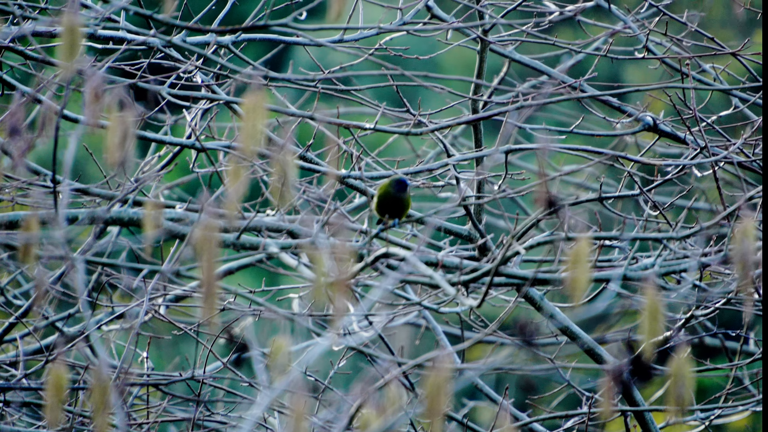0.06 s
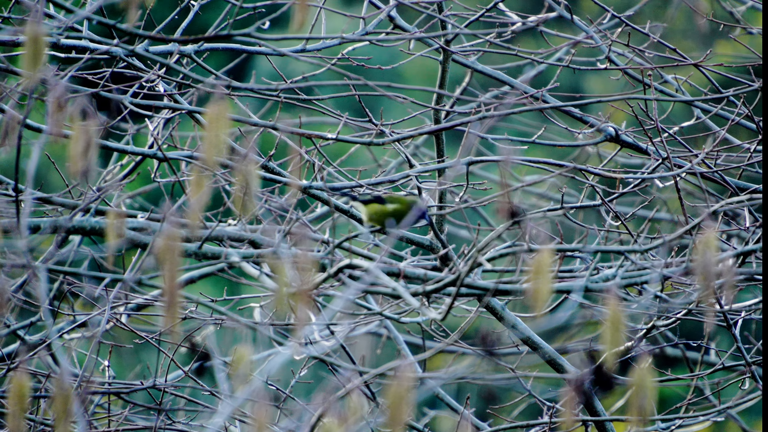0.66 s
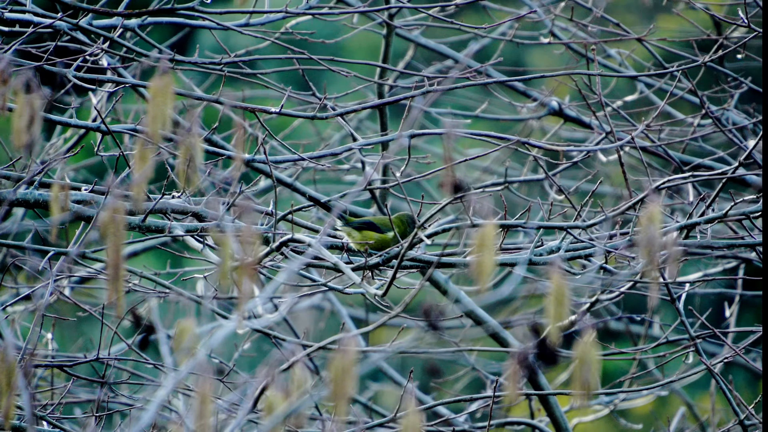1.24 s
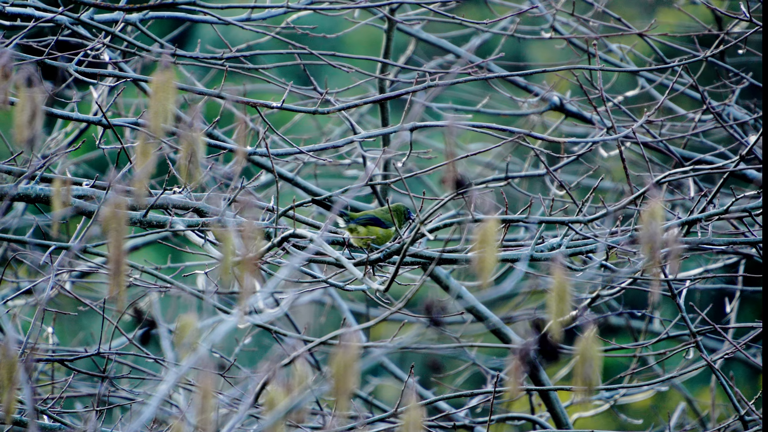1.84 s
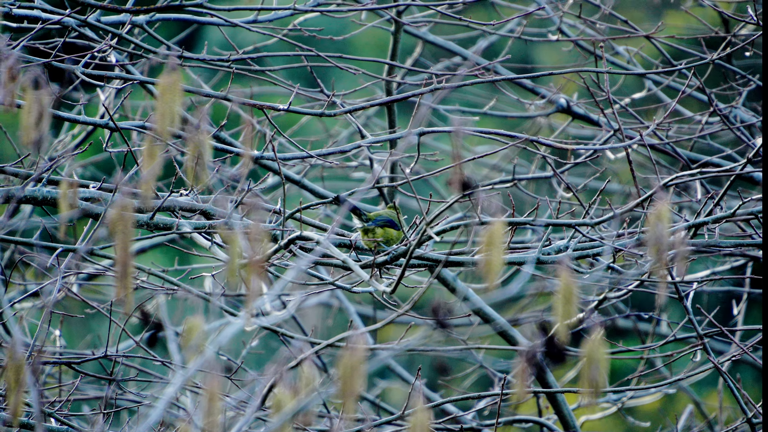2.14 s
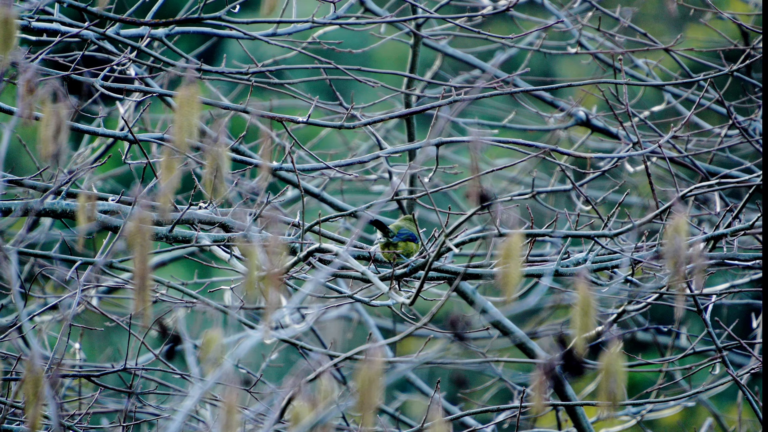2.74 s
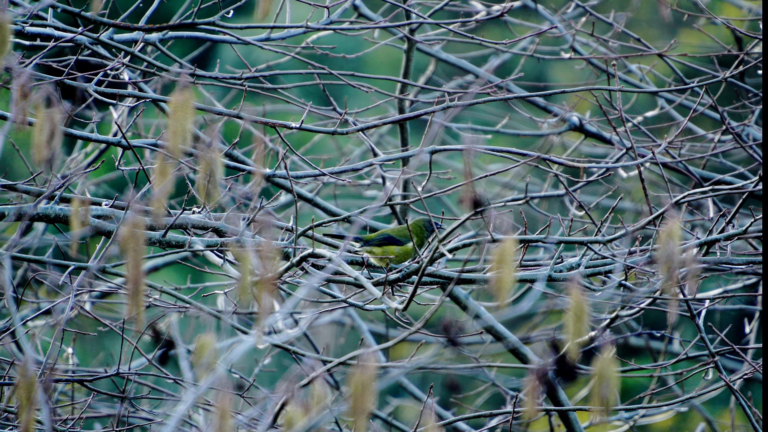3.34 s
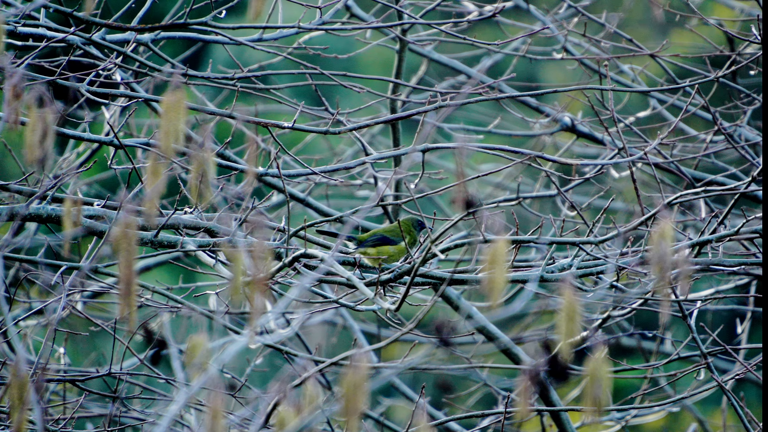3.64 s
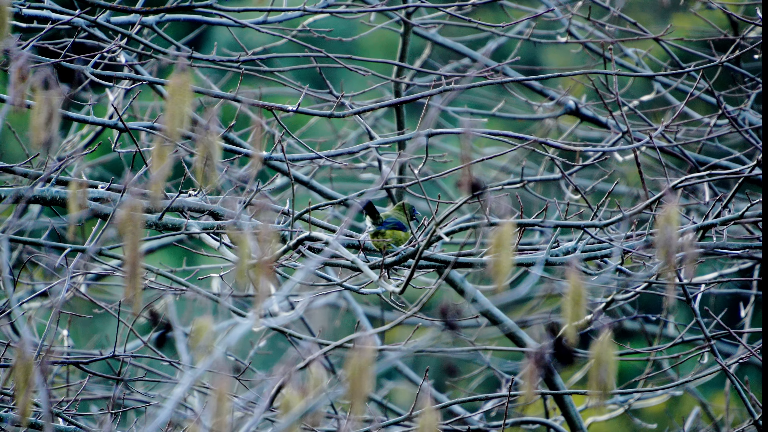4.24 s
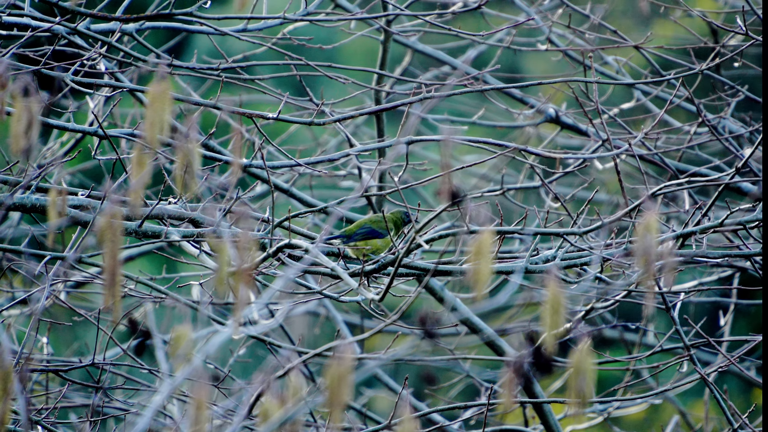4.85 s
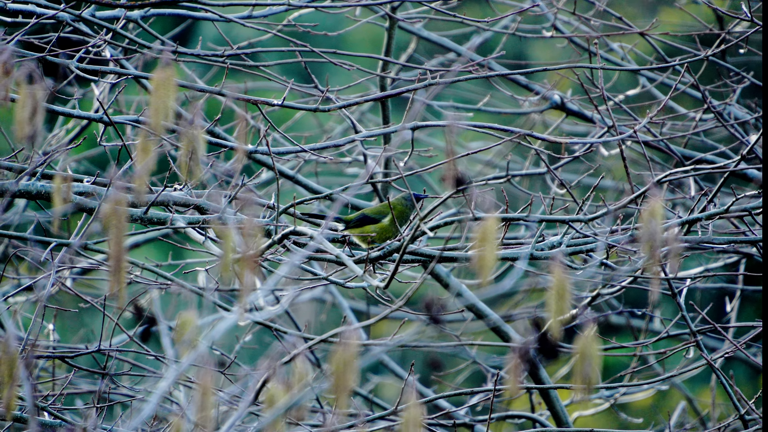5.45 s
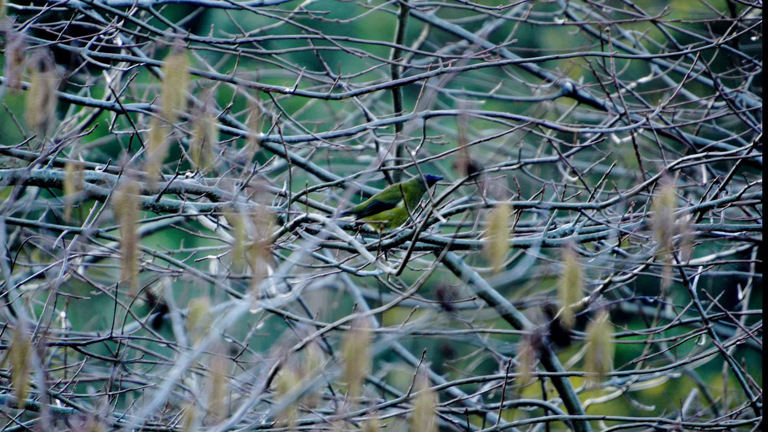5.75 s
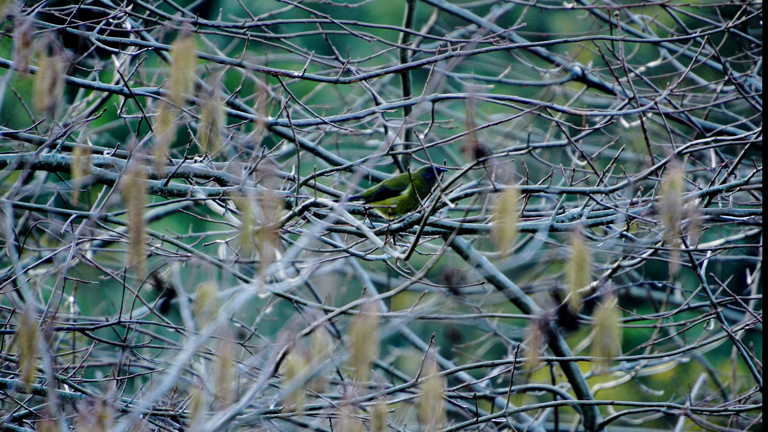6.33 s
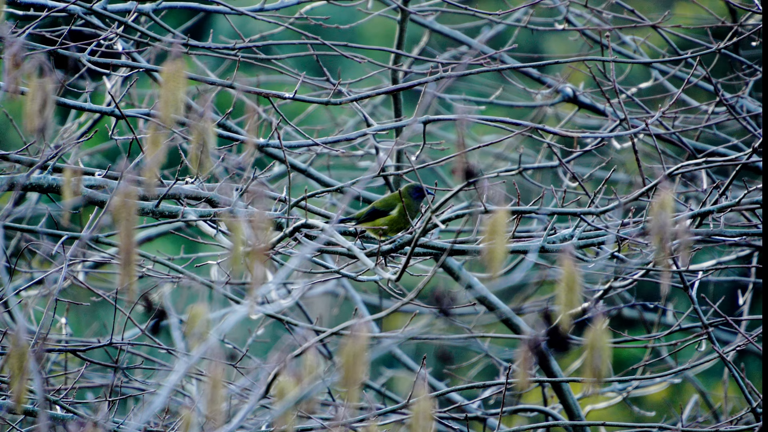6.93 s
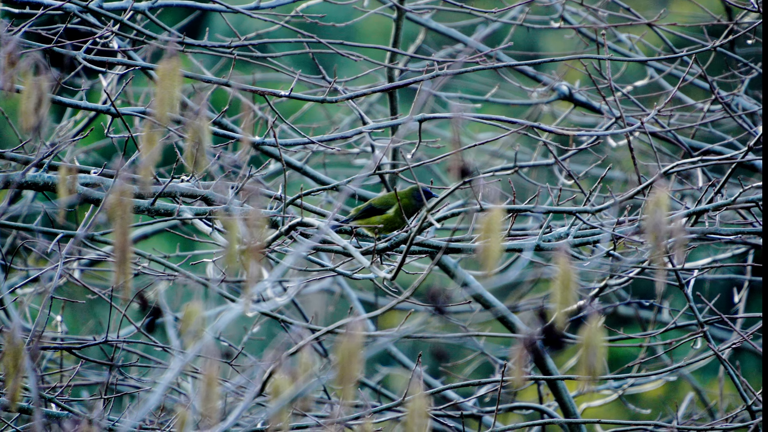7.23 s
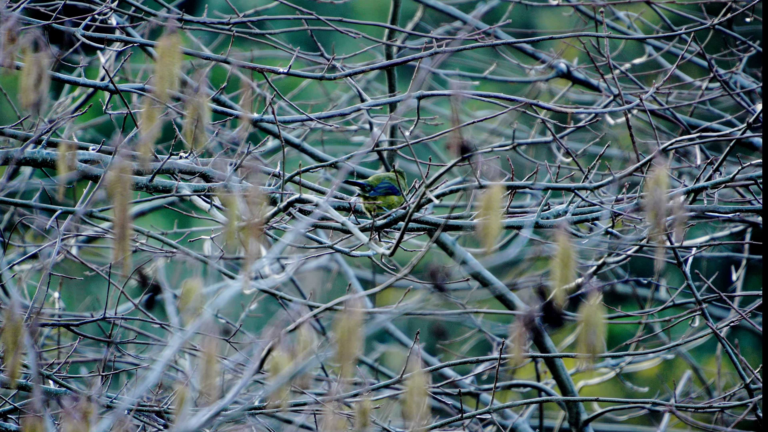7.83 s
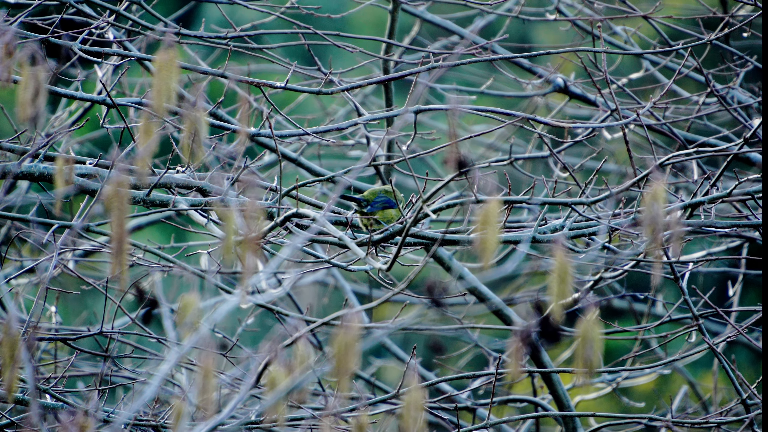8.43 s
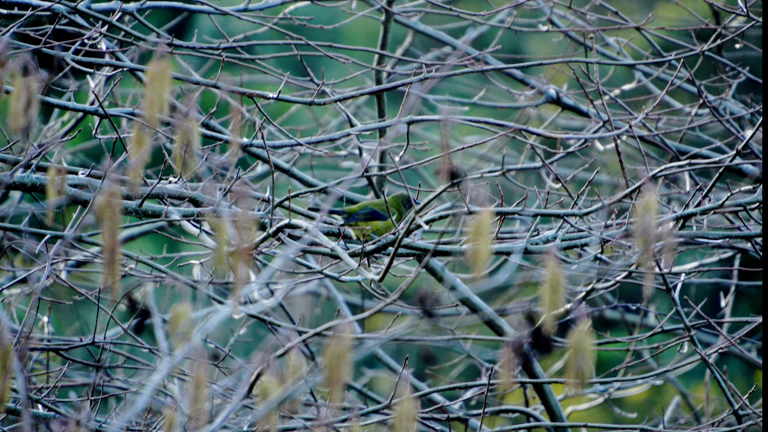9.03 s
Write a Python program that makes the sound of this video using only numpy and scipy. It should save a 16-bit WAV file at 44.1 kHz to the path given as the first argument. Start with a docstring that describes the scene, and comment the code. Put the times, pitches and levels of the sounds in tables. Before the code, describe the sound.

Short pure whistles, sharp tocks and ringing bell-like notes come from a nearby songbird, over far twittering and a soft outdoor hush.

```python
"""A bellbird sings in a thicket: pure bell notes, whistles, down-slurs, sharp tocks, a chirp and a rasp.
Each note is one push of air on the membranes of its syrinx; both sides sound in the chirp and the rasp.
Air hisses through its beak and feathers brush twigs. Further off, other birds twitter, peep and call.
Twigs scatter every note and the trees ring on after it, over a soft outdoor hush."""
import sys
import numpy as np
from scipy import signal
from scipy.fft import rfft, irfft
from scipy.io import wavfile
from scipy.ndimage import uniform_filter1d

SR = 44100
rng = np.random.default_rng(int(sys.argv[2]) if len(sys.argv) > 2 else 0)


def inscribe(sig):
    """Save sig as 16-bit PCM at rate SR to the path in sys.argv[1].

    A 1-D sig is mono; a 2-D sig holds one channel per row.
    Samples are clipped to [-1, 1] before scaling.
    """
    pcm = np.round(np.clip(np.atleast_2d(sig).T, -1, 1) * 32767)
    wavfile.write(sys.argv[1], SR, pcm.astype(np.int16))


N = 404838
FREQS = np.maximum(np.fft.rfftfreq(N, 1 / SR), 1)

# tone colour of the outdoor bed: f/Hz, level/dB
HUSH_COLOUR = [(25, -17.5), (70, -26.5), (130, -24), (250, -16.5), (540, -4), (900, -7), (2000, -10),
               (3400, -12), (4600, -17.5), (9000, -18.5), (15500, -12.5)]
# stereo image of the bed: f/Hz, left-right correlation
HUSH_CORRELATION = [(30, 0.94), (125, .7), (300, .2), (1000, .25), (15000, .05)]
# low moans: t/s, length/s, f/Hz, level/dB
MOAN_NOTES = [(3.75, 0.57, 233, -84), (4.147, 0.28, 292, -79.5), (5.599, 0.29, 243.4, -84)]
# faint hoots: t/s, length/s, f/Hz, level/dB
HOOT_NOTES = [(1.663, 0.077, 710, -67), (4.425, 0.059, 835, -62.5), (5.921, 0.073, 738, -65.5),
              (6.097, 0.08, 704, -62.5), (7.37, .11, 727, -64.5)]
# wheezy calls: t/s, length/s, f/Hz, glide/Hz, level/dB, pan/dB (left minus right)
WHEEZE_NOTES = [(-0.0482, 0.102, 7700, 2, -44.5, .5), (0, .11, 4420, 400, -62.5, 9),
                (-.03, 0.084, 2480, -100, -60, 13), (0.6747, .138, 8040, 1050, -42.5, .5),
                (0.68, 0.191, 4640, 2, -57.5, 10), (.728, .06, 2520, -220, -57, 14),
                (0.94, .17, 4540, -100, -63, 9), (6.5, 0.05, 3400, -800, -63.5, 0),
                (8.885, .07, 2750, 500, -60, 0), (1.89, .038, 5090, 598, -42, 6)]
# rising calls: t/s, length/s, first f/Hz, target f/Hz, level/dB, pan/dB
RISER_NOTES = [(5.837, 0.064, 7350, 8320, -52, 3), (6.035, 0.06, 8320, 8780, -38.5, -3),
               (6.198, 0.074, 7580, 8850, -47, -4), (6.484, 0.039, 7350, 8100, -54.5, -2),
               (7.087, 0.079, 6530, 6880, -46, -9), (7.269, 0.068, 6360, 7126, -39, -6.5),
               (7.489, 0.069, 6610, 6820, -55, -9), (7.873, 0.091, 6440, 6770, -51.5, -9),
               (8.034, .11, 6200, 6590, -48.5, -5.5)]
# arched chips: t/s, length/s, top f/Hz, level/dB, pan/dB
CHIP_NOTES = [(.920, 0.044, 1562, -54.5, 19), (1.633, 0.04, 1630, -51.5, 13), (2.491, 0.033, 1590, -59, 12),
              (2.726, .09, 4206, -53, 4), (2.726, .08, 4680, -56.5, 4), (3.353, .05, 1600, -53.5, 7),
              (5.105, .075, 4580, -54.5, 4)]
# far whistles: t/s, length/s, f/Hz, glide/Hz, level/dB, pan/dB
FAR_WHISTLE_NOTES = [(0.545, 0.0176, 2870, 500, -57, 16), (0.621, 0.059, 7190, -140, -49, -3.5),
                     (0.588, .24, 4135, -520, -54, 6), (5.592, 0.092, 8630, -29.5, -61, -2.5),
                     (6.514, 0.0623, 8360, -400, -47, 0.5), (6.67, 0.0096, 8600, -190, -50, 0),
                     (6.709, 0.057, 6770, 0, -57.5, -12)]
# shivering trills: t/s, length/s, level/dB
TRILL_NOTES = [(5.005, 0.054, -58.5), (6.993, 0.13, -55.5), (7.775, 0.13, -55)]
# pitch curve of one twitter: t/s from its start, f/Hz
TWITTER_PITCH = [(0, 3200), (.011, 4650), (.036, 4840), (.044, 3600), (.066, 3280), (.087, 3850),
                 (.096, 3150), (.105, 2980), (.116, 3300)]
# repeats of the twitter: t/s, level/dB
TWITTER_CUES = [(1.653, -55.5), (3.081, -57.5), (4.004, -59), (4.968, -56.5), (5.899, -55.5), (6.832, -53),
                (7.684, -56), (8.813, -56)]

# envelope of the feather rustle: t/s, level/dB
RUSTLE_ENVELOPE = [(6.68, -76), (6.86, -59), (7.16, -64.5), (7.48, -78)]
# hoarse hisses: t/s, length/s, level/dB, crest (loudest point, 0-1 of the length)
HISS_CUES = [(1.643, 0.099, -55.5, 0.1), (5.013, 0.035, -58.5, 0), (5.906, 0.23, -43.5, 0.62)]
# tone colour of air through the beak: f/Hz, level/dB
BEAK_COLOUR = [(350, -71), (600, -18), (899, -41), (1260, -0.5), (1400, -28), (1790, -1.5), (2020, -8.5),
               (2860, -14), (3270, -30), (4010, -12.5), (7750, -4.5), (8990, -15), (11000, -13.5),
               (11800, -25), (15000, -19)]
# beak snaps and twig ticks: t/s, level/dB
TICK_CUES = [(5.9101, -49), (5.9390, -48)]
# sharp tocks: t/s, f/Hz, level/dB, length/s
TOCK_NOTES = [(1.7797, 1900, -30.5, 0.0077), (2.629, 1960, -29.5, 0.007), (5.168, 1933, -29.5, 0.0067),
              (7.741, 1980, -26, 0.0089), (9.0586, 2020, -29, 0.0052)]
# air torn by a harsh note: f/Hz, level/dB
TURBULENCE_COLOUR = [(1500, -62.5), (4800, -21), (7200, -4), (9000, 2), (10800, -1), (12200, -17),
                     (15000, -9)]
# the rasp's two voices: f/Hz, glide/Hz, level/dB before the throat, crest, swing (share of pitch)
RASP_PAIR = [(2774, -70, -33, .76, .05), (3395, -300, -30.5, .36, .023)]
# partials of each rasp voice: harmonic, level/dB
RASP_PARTIALS = [(1, 0), (2, -34.5), (3, -27)]
# the throat's filter during the rasp: f/Hz, gain/dB
THROAT_EQ = [(2250, -29.5), (2560, 1.5), (3000, -0.5), (3650, 0.5), (3950, -14.5), (6000, -6.5), (8600, 5),
             (11500, -9.5)]
# both sides of the syrinx in the chirp: t/s, lower f/Hz, upper f/Hz
CHIRP_PITCH = [(1.946, 2514, 2668), (1.970, 2950, 3520), (1.986, 3350, 3850), (2.003, 4194, 4406),
               (2.026, 4387, 5050), (2.050, 3670, 4170), (2.077, 3353, 4180), (2.108, 3080, 3650)]
# pure voice, with faint overtones leaking past the throat: harmonic, level/dB
PURE_PARTIALS = [(1, -1), (2, -54.5), (4, -58), (5, -41.5), (6, -56), (7, -52)]
# reedy voice, with a strong octave: harmonic, level/dB
REEDY_PARTIALS = [(1, -3.5), (2, 1), (3, -30), (4, -20.5)]
# down-slurs: t/s, length/s, first f/Hz, level/dB
SLUR_NOTES = [(1.21, 0.068, 2620, -58.5), (2.152, 0.042, 2650, -43.5), (2.224, 0.063, 2518, -53),
              (2.272, 0.046, 2124, -51), (2.310, 0.059, 2700, -35.5), (5.327, 0.045, 2370, -54),
              (5.406, 0.028, 2660, -55), (5.437, 0.019, 2630, -45.5), (5.484, 0.066, 2716, -34.5),
              (8.167, 0.053, 2507, -51.5), (8.219, .048, 1855, -52)]
# reedy note: t/s, length/s, f/Hz, glide/Hz, level/dB, pan/dB
REEDY_NOTES = [(8.946, 0.099, 2491, -78, -43.5, -2.5)]
# the bellbird's held whistles: t/s, length/s, f/Hz, glide/Hz, level/dB, pan/dB
WHISTLE_NOTES = [ (0.989, 0.093, 1720, -150, -50.5, -2), (1.424, 0.12, 2143, 27, -42.5, -2),
                 (1.95, 0.09, 2130, 150, -52, .5), (2.517, 0.096, 4070, 68, -60, -7),
                 (2.774, 0.055, 2537, 75, -49, 1), (2.83, .105, 1268, 0, -38, 1),
                 (2.876, .15, 1229, 41, -35, 0), (3.188, 0.058, 3105, 76, -50, -8),
                 (3.442, .07, 2422, 170, -38, 1.5), (3.489, .12, 2462, -17, -40.5, -1),
                 (3.49, .11, 2238, -130, -48, 0), (3.615, 0.1, 987, -43, -52, 2.5),
                 (4.434, 0.061, 1702, 80, -47, 7.5), (6.37, 0.18, 1252, 24, -62, 2.5),
                 (6.445, 0.084, 1025, -13, -55, 4), (6.725, 0.03, 1394, -17, -40, -6),
                 (6.749, 0.056, 1437, 155, -33.5, -6), (6.76, 0.053, 2590, 30, -58, 2),
                 (6.779, 0.1, 1077, -64, -37.5, 1), (7.119, 0.12, 2918, 0, -57.5, -3),
                 (7.626, 0.1, 2014, 171.5, -41, -3.5), (7.64, 0.15, 2740, 580.5, -57.5, -5.5),
                 (8.139, 0.14, 1002, 0.5, -59.5, 3), (9.026, 0.073, 2670, -510, -54, 0)]
# its two loud bell notes: t/s, length/s, f/Hz, level/dB, crest, pan/dB
BELL_NOTES = [(4.48, 0.14, 1814, -15.5, .56, 2), (4.611, 0.11, 2841, -21, 0.67, -2.5)]


def undb(db):
    """Decibels to gain."""
    return 10 ** (np.asarray(db) / 20)


def add(bus, start, sound):
    """Mix a sound into a stereo bus at its start time."""
    i = int(start * SR)
    sound = sound[..., max(-i, 0):N - i]
    bus[:, max(i, 0):max(i, 0) + sound.shape[-1]] += sound


def curves(table):
    """Turn breakpoints in time into one curve per column."""
    times, *columns = np.transpose(table)
    t = np.arange(times[0], times[-1], 1 / SR)
    return [np.interp(t, times, column) for column in columns]


def over_freqs(points):
    """Join breakpoints on a log-frequency axis."""
    hz, value = np.transpose(points)
    return np.interp(np.log(FREQS), np.log(hz), value)


def noise(colour):
    """Noise of unit level, shaped by a gain at each frequency."""
    x = irfft(rfft(rng.standard_normal(N)) * colour, N)
    return x / x.std()


def wander(size, rate):
    """A random drift that takes a new value rate times a second."""
    at = np.arange(size) * rate / SR
    points = rng.standard_normal(int(at[-1]) + 2)
    return np.interp(at, np.arange(len(points)), points)


def swell(length, crest, steepness=1.14):
    """One push of air: it rises to its crest and dies away."""
    progress = np.linspace(0, 1, max(int(length * SR), 8))
    skewed = np.interp(progress, [0, np.clip(crest, .05, .95), 1], [0, .5, 1])
    return np.abs(np.sin(np.pi * skewed)) ** steepness


def held(length, hz, glide_hz, db, sag, crest, steepness=1.02):
    """Pitch and gain of an evenly gliding note; it goes flat by the share sag as the air fails."""
    push = swell(length, crest, steepness)
    pitch = hz + glide_hz * np.linspace(-.5, .5, len(push))
    return pitch * (1 - sag * (1 - push)), undb(db) * push


def slurred(length, first_hz, target_hz, db, settle_s, crest):
    """Pitch and gain of a note that slides fast at first, then eases towards its target."""
    push = swell(length, crest)
    t = np.arange(len(push)) / SR
    return target_hz + (first_hz - target_hz) * np.exp(-t / settle_s), undb(db) * push


def syrinx(hz, gain, partials=((1, 0),), jitter=.009, jitter_rate=470):
    """An unsteady membrane tone as a complex wave; by default a far bird's, with no overtones left."""
    pitch = hz * (1 + jitter * wander(len(hz), jitter_rate))
    phase = 2 * np.pi * np.cumsum(pitch) / SR
    tone = sum(undb(db) * np.exp(1j * k * phase) for k, db in partials if k * hz.max() < SR / 2)
    return np.sqrt(2) * gain * tone


def place(wave, pan_db, lead_rad_per_db=.07):
    """Pan a tone: the nearer side gets it louder and a little earlier."""
    side_db = pan_db * np.array([[.5], [-.5]])
    return np.real(wave * undb(side_db) * np.exp(1j * side_db * lead_rad_per_db))


def hush(level_db=-63, hum_hz=149):
    """The bed: a gently drifting outdoor murmur and fine hiss, with a faint hum."""
    colour = undb(over_freqs(HUSH_COLOUR))
    alike = np.clip(over_freqs(HUSH_CORRELATION), 0, 1)
    mid = noise(colour)
    side = noise(colour * np.sqrt((1 - alike) / (1 + alike)))
    hum = undb(-97.5) * noise(np.exp(-((FREQS - hum_hz) / 4) ** 2))
    drift = undb(level_db + .44 * wander(N, 1.8))
    return drift * (mid + side * np.array([[1], [-1]])) + hum


def thicket(x, twigs_db, trees_db, twigs_t60=.38, trees_t60=1.5, damping_hz=8000, centre=.89, tilt_db=3):
    """Reverb: quick scatter from nearby twigs, a long faint ring from the trees; treble dies sooner."""
    t = np.arange(int(1.5 * SR)) / SR
    response = 0
    # tilt colours the twig scatter in dB an octave; trunks return all pitches alike
    for db, t60, tilt in (twigs_db, twigs_t60, tilt_db), (trees_db, trees_t60, 0):
        scatter = rng.standard_normal((3, len(t))) * undb(2 * rng.standard_normal((3, len(t))))
        envelope = undb(-60 * t / t60) * (1 - np.exp(-t / .004))
        echoes = (scatter[:2] + centre * scatter[2]) * envelope
        echoes *= undb(db) / np.sqrt(np.sum(echoes ** 2) / 2)
        hz, when, cells = signal.stft(echoes, SR, nperseg=256)
        octaves = np.log2(np.clip(hz, 1000, 12000) / 3000)[:, None]
        damping_db = 26.5 * np.outer(hz / damping_hz, when)
        response = response + signal.istft(cells * undb(tilt * octaves - damping_db), SR)[1]
    return x + signal.fftconvolve(x, response, axes=1)[:, :N]


def low_calls():
    """Faint falling hoots from far off, and fainter moans below them."""
    out = np.zeros((2, N))
    for start, length, hz, db in HOOT_NOTES:
        hoot = held(length, hz, glide_hz=-48, db=db, sag=.004, crest=.48)
        add(out, start, place(syrinx(*hoot), pan_db=3.5))
    for start, length, hz, db in MOAN_NOTES:
        moan = held(length, hz, 0, db, sag=.06, crest=.55)
        add(out, start, place(syrinx(*moan), pan_db=0))
    return out


def high_calls():
    """Single far calls: thin whistles, arched chips, risers, and wheezes roughened by fast jitter."""
    out = np.zeros((2, N))
    for start, length, hz, glide_hz, db, pan_db in FAR_WHISTLE_NOTES:
        whistle = held(length, hz, glide_hz, db, sag=.0035, crest=.43)
        add(out, start, place(syrinx(*whistle), pan_db))
    for start, length, hz, db, pan_db in CHIP_NOTES:
        chip = held(length, hz, 0, db, sag=.11, crest=.42)
        add(out, start, place(syrinx(*chip, jitter=.014, jitter_rate=600), pan_db))
    for start, length, first_hz, target_hz, db, pan_db in RISER_NOTES:
        riser = slurred(length, first_hz, target_hz, db, settle_s=.028, crest=.66)
        add(out, start, place(syrinx(*riser), pan_db))
    for start, length, hz, glide_hz, db, pan_db in WHEEZE_NOTES:
        wheeze = held(length, hz, glide_hz, db, sag=.0154, crest=.514)
        add(out, start, place(syrinx(*wheeze, jitter=.028, jitter_rate=1000), pan_db))
    return out


def peeps(start=3.785, every_s=.215, count=10, first_hz=6580, sink_hz=28.5, full_db=-61):
    """An even row of thin rising peeps fades in, each pitched a little below the last."""
    out = np.zeros((2, N))
    for k, scatter_db in enumerate(1.5 * rng.standard_normal(count)):
        db = full_db + min(1.8 * k - 9, 0) + scatter_db
        note = held(length=.07, hz=first_hz - k * sink_hz, glide_hz=120, db=db, sag=.015, crest=.6)
        add(out, start + k * every_s, place(syrinx(*note), pan_db=-2.5))
    return out


def pips(start=.164, every_s=.103, count=4, first_db=-67, growth_db=2.5):
    """A quick row of rough falling pips, each louder than the last."""
    out = np.zeros((2, N))
    for k in range(count):
        note = held(length=.028, hz=1870, glide_hz=-1050, db=first_db + k * growth_db, sag=0, crest=.21)
        add(out, start + k * every_s, place(syrinx(*note, jitter=.092, jitter_rate=930), pan_db=4.5))
    return out


def trills(centre_hz=7900, swing=.02, shake_hz=42, tremolo=.73):
    """A high tone shivers with fast vibrato and tremolo."""
    out = np.zeros((2, N))
    for start, length, db in TRILL_NOTES:
        push = swell(length, crest=.35, steepness=1)
        shake = 2 * np.pi * shake_hz * np.arange(len(push)) / SR
        pitch = centre_hz * (1 + swing * np.cos(shake))
        gain = undb(db) * push * (1 + tremolo * np.sin(shake))
        add(out, start, place(syrinx(pitch, gain, jitter=.042, jitter_rate=830), pan_db=1))
    return out


def twitters(flutter_db=4, bend=.03):
    """A bird on the left repeats one wavy figure, never quite alike."""
    out = np.zeros((2, N))
    hz, = curves(TWITTER_PITCH)
    push = swell(len(hz) / SR, crest=.3, steepness=.31)
    for start, db in TWITTER_CUES:
        pitch = hz[:len(push)] * (1 + bend * wander(len(push), 220))
        gain = push * undb(db + flutter_db * wander(len(push), 200))
        add(out, start, place(syrinx(pitch, gain, jitter=.022, jitter_rate=800), pan_db=6))
    return out


def rustle(grain_db=4, centre_hz=12500, width_hz=5000):
    """Fine dry crackle of feathers brushing twigs."""
    envelope = np.zeros((2, N))
    add(envelope, RUSTLE_ENVELOPE[0][0], undb(curves(RUSTLE_ENVELOPE)[0]))
    colour = np.exp(-((FREQS - centre_hz) / width_hz) ** 2)
    crackle = np.array([noise(colour), noise(colour)]) * undb(grain_db * wander(N, 400))
    return place(envelope * crackle, pan_db=-5)


def hisses(grain_db=3, spread=.76):
    """Grainy air noise through the open beak, and two dry ticks cut from the same noise."""
    envelope, colour = np.zeros((2, N)), undb(over_freqs(BEAK_COLOUR))
    air = noise(colour) + spread * np.array([noise(colour), noise(colour)])
    grain = undb(grain_db * wander(N, 500))
    for start, length, db, crest in HISS_CUES:
        add(envelope, start, undb(db) * swell(length, crest, steepness=1.24))
    for start, db in TICK_CUES:
        add(envelope, start, undb(db) * swell(.0041, crest=.12))
    return envelope * air * grain


def tocks(fall=.11):
    """About a dozen cycles of a falling tone, cut short like a tap on wood."""
    out = np.zeros((2, N))
    for start, hz, db, length in TOCK_NOTES:
        gain = undb(db) * swell(length, crest=.44, steepness=2.9)
        pitch = hz * (1 + fall * np.linspace(1, -1, len(gain)))
        voice = syrinx(pitch, gain, [(1, 1), (4, -36.5)], jitter=.031, jitter_rate=320)
        add(out, start, place(voice, pan_db=-2))
    return out


def with_turbulence(voice, db):
    """A harsh note tears the air: a hiss rides its envelope."""
    colour = undb(over_freqs(TURBULENCE_COLOUR))
    flow = uniform_filter1d(np.abs(voice), size=40, axis=1)
    return voice + undb(db) * flow * (noise(colour) + np.array([noise(colour), noise(colour)]))


def rasp(start=4.129, length=.28, buzz_hz=140.7, slowing=.37, throb=.41):
    """An uneven, slowing buzz shakes two voices in pitch and level; the throat narrows their band."""
    out = np.zeros((2, N))
    for centre_hz, glide_hz, db, crest, swing in RASP_PAIR:
        hz, gain = held(length, centre_hz, glide_hz, db, sag=0, crest=crest, steepness=.76)
        rate = buzz_hz * (1 - slowing * np.linspace(0, 1, len(hz)) ** 1.5)
        buzz = 2 * np.pi * np.cumsum(rate * (1 + .16 * wander(len(rate), 150))) / SR
        hz *= 1 + swing * np.sin(buzz)
        gain *= 1 + throb * np.cos(buzz)
        add(out, start, place(syrinx(hz, gain, RASP_PARTIALS, jitter=.042, jitter_rate=640), pan_db=-2))
    throaty = irfft(rfft(out) * undb(over_freqs(THROAT_EQ)), N)
    return with_turbulence(throaty, db=-24)


def chirp(low_db=-27.5, high_db=-32, flutter_db=1):
    """Two voices arch up and down on one fluttering push of air and beat against each other."""
    out = np.zeros((2, N))
    low, high = curves(CHIRP_PITCH)
    push = swell(len(low) / SR, crest=.28, steepness=.58)
    for hz, db in (low, low_db), (high, high_db):
        gain = push * undb(db + flutter_db * wander(len(push), 118))
        voice = syrinx(hz[:len(push)], gain, [(1, 0), (2, -37)], jitter=.016, jitter_rate=500)
        add(out, CHIRP_PITCH[0][0], place(voice, pan_db=5, lead_rad_per_db=.36))
    return with_turbulence(out, db=-30.5)


def slurs(target_hz=1747):
    """Quick slides, all down towards the same low note."""
    out = np.zeros((2, N))
    for start, length, first_hz, db in SLUR_NOTES:
        note = slurred(length, first_hz, target_hz, db, settle_s=.021, crest=.15)
        add(out, start, place(syrinx(*note, PURE_PARTIALS, jitter=.01, jitter_rate=300), pan_db=-.5))
    return out


def whistles(waver=.0092, waver_db=1.1, waver_rate=45):
    """The bellbird's softer notes: pure whistles that waver in pitch and level, and one reedy note."""
    out = np.zeros((2, N))
    for start, length, hz, glide_hz, db, pan_db in WHISTLE_NOTES:
        pitch, gain = held(length, hz, glide_hz, db, sag=.011, crest=.48, steepness=1.16)
        pitch *= 1 + waver * wander(len(gain), waver_rate)
        gain *= undb(waver_db * wander(len(gain), waver_rate))
        add(out, start, place(syrinx(pitch, gain, PURE_PARTIALS, jitter=.0056, jitter_rate=300), pan_db))
    for start, length, hz, glide_hz, db, pan_db in REEDY_NOTES:
        note = held(length, hz, glide_hz, db, sag=.002, crest=.62)
        add(out, start, place(syrinx(*note, REEDY_PARTIALS, jitter=.0031, jitter_rate=290), pan_db))
    return out


def bells():
    """The lead: two loud, almost pure tones that go slightly flat as the air fails."""
    out = np.zeros((2, N))
    for start, length, hz, db, crest, pan_db in BELL_NOTES:
        note = held(length, hz, 0, db, sag=.02, crest=crest, steepness=1.5)
        add(out, start, place(syrinx(*note, PURE_PARTIALS, jitter=.0012, jitter_rate=830), pan_db))
    return out


def scene():
    """The mix: the bellbird close and fairly dry, the far birds wetter, the hush underneath."""
    loud = thicket(bells() + chirp() + rasp() + hisses() + rustle(),
                   twigs_db=-11.5, trees_db=-17, tilt_db=2)
    ringing = thicket(whistles(), twigs_db=-9, trees_db=-14.5, tilt_db=.5)
    clattering = thicket(slurs() + tocks(), twigs_db=-6, trees_db=-17.5, twigs_t60=.32, tilt_db=0)
    far = thicket(high_calls() + low_calls() + peeps() + trills(), twigs_db=-5, trees_db=-9)
    hidden = thicket(twitters() + pips(), twigs_db=-2.5, trees_db=-9.5, twigs_t60=.25, tilt_db=-3)
    return loud + ringing + clattering + far + hidden + hush()


def record(dry, top_hz=15900):
    """A steep low-pass trims the very top of the mix."""
    return signal.sosfilt(signal.ellip(10, .2, 70, top_hz, fs=SR, output="sos"), dry)


dry = scene()
out = record(dry)
inscribe(out)
```